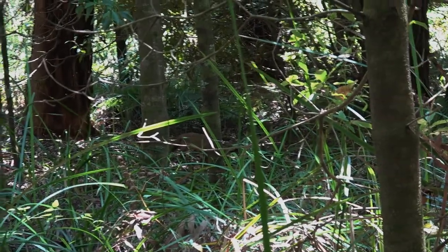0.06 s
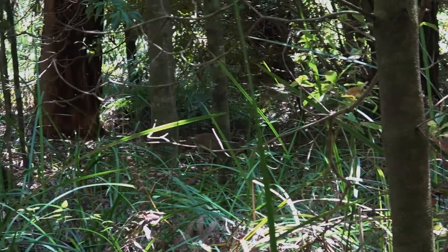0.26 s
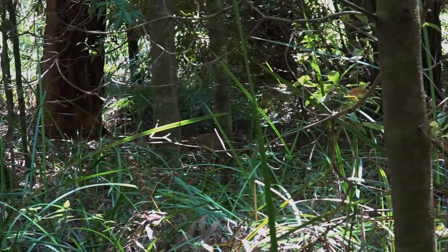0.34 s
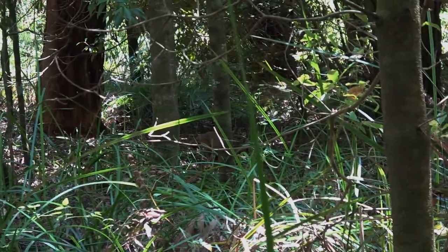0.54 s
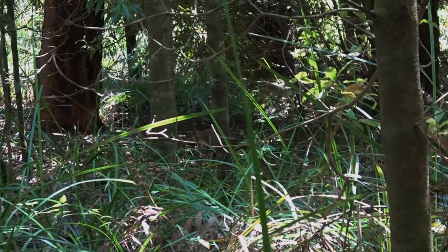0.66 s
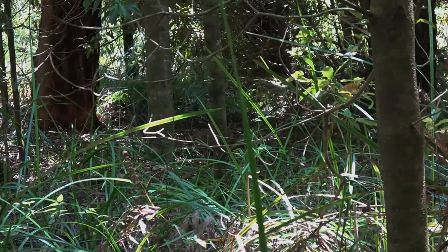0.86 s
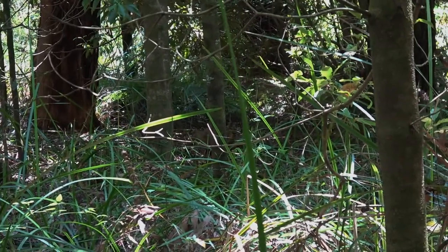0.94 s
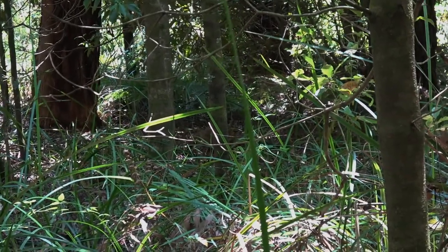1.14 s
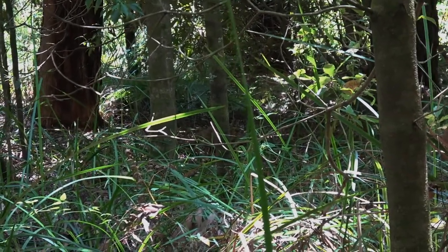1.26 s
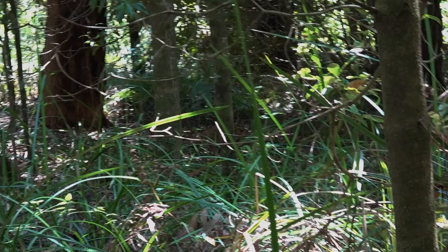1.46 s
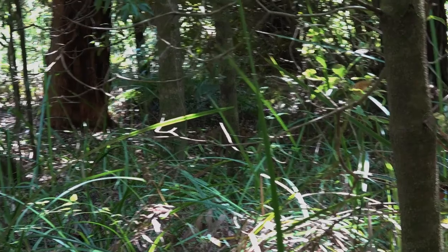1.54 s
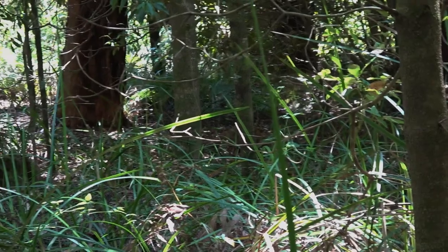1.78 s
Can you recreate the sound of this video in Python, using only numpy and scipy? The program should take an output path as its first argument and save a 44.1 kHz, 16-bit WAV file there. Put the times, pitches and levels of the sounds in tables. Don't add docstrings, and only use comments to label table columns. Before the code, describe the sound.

A whipbird close by, slightly right, repeats pure high whistles that build in strength, drops in a fast slide, then whips sharply upward; the crack rings among trees, followed by faint distant chirps over soft bush hush.

```python
import sys
import numpy as np
from scipy import signal
from scipy.fft import rfft, irfft
from scipy.io import wavfile
from scipy.ndimage import uniform_filter1d

SR = 44100
rng = np.random.default_rng(int(sys.argv[2]) if len(sys.argv) > 2 else 0)


def undo_db(level):
    steps = np.asarray(level, float) / 20
    return 10 ** steps


def to_wav(sig):
    pcm = np.clip(np.atleast_2d(sig), -1, 1) * 32767
    pcm = np.round(pcm).astype(np.int16)
    wavfile.write(sys.argv[1], SR, pcm.T)


N = 79380


def level(x, db):
    return x * undo_db(db) / np.sqrt(np.mean(x ** 2))


def band(hz, width, order=2):
    f = np.arange(N // 2 + 1) * SR / N
    bell = 1 / (1 + ((f - hz) / (width / 2)) ** 2) ** order
    return level(irfft(rfft(rng.standard_normal(N)) * bell, N), 0)


def walk(rate):
    k = int(SR / rate)
    held = np.repeat(rng.standard_normal(N // k + 1), k)
    return 1.05 * uniform_filter1d(uniform_filter1d(held, k), k)[:N]


def pan(x, left_over_right_db):
    return x * undo_db(np.array([[left_over_right_db], [-left_over_right_db]]) / 2)


def sides(x):
    return x * np.array([[1], [-1]])


def tail(t60, rise):
    t = np.arange(N) / SR
    cloud = rng.standard_normal(N) * (1 - np.exp(-t / rise)) * undo_db(-60 * t / t60)
    return level(cloud, 0) / np.sqrt(N)


def spread(x, cloud):
    return signal.fftconvolve(x, cloud)[:N]


def notes(table, share, up, down, sag=1):
    t = np.arange(N) / SR
    for start, length, db, first, last in table:
        u = (t - start) / length
        on = (u >= 0) & (u < 1)
        swell = np.sin(np.pi / 2 * np.clip(u / share, 0, 1)) ** up
        fade = np.sin(np.pi / 2 * np.clip((1 - u) / (1 - share), 0, 1)) ** down
        pitch = first + (last - first) * np.clip(u, 0, 1) ** sag
        yield pitch, on * swell * fade * undo_db(db) * np.sqrt(2)


def slide(curve):
    edge_s = 0.008
    t = np.arange(N) / SR
    s, hz, db = np.array(curve).T

    def smooth(v):
        return uniform_filter1d(np.interp(t, s, v), size=300)

    edge = np.clip(np.minimum(t - s[0], s[-1] - t) / edge_s, 0, 1) ** 2
    return smooth(hz), edge * undo_db(smooth(db)) * np.sqrt(2)


def voice(parts, second_db):
    third_db, breathy_db, air_hz = -38, -24.5, 13000
    tone, over = 0, 0
    breath = 1 + undo_db(breathy_db) * band(170.0, 440.0)
    for hz, gain in parts:
        phase = 2 * np.pi * np.cumsum(hz) / SR
        second = undo_db(second_db) * np.sin(2 * phase) / (1 + (2 * hz / air_hz) ** 6)
        third = undo_db(third_db) * np.sin(3 * phase) / (1 + (3 * hz / air_hz) ** 6)
        tone = tone + gain * breath * np.sin(phase)
        over = over + gain * (second + third)
    return tone, over


def whipbird():
    # (start [s], length [s], level [dB], first pitch [Hz], last pitch [Hz])
    whistles = [(-.005, 0.08, -36, 3652, 3551), (.118, 0.079, -31.5, 3595, 3506),
                (.252, .066, -25, 3626, 3516), (.378, 0.076, -24, 3574, 3509), (.5, 0.062, -23, 3600, 3452),
                (.572, 0.069, -36.5, 3480, 3510), (.622, .034, -24, 3566, 3533),
                (.648, 0.051, -16, 3579, 3547), (.76, .058, -17.5, 3594, 3462),
                (.81, 0.03, -18, 3472, 3460), (.862, 0.016, -39.5, 3454, 3440)]
    # (time [s], pitch [Hz], level [dB])
    fall = [
        (.896, 3540, -46),
        (.908, 3316, -32),
        (.926, 2910, -26),
        (.945, 2489, -30),
        (.97, 2134, -33),
        (.99, 1846, -37.5),
        (1.012, 1737, -38.5),
        (1.035, 1693, -55),
    ]
    # (time [s], pitch [Hz], level [dB])
    whip = [
        (1.108, 3295, -48),
        (1.12, 3269, -31.5),
        (1.14, 3466, -23.5),
        (1.16, 3866, -20),
        (1.175, 4526, -23.5),
        (1.198, 5870, -26.5),
        (1.216, 6820, -30),
        (1.228, 7460, -37),
        (1.236, 8280, -53),
    ]
    note_wet_db, slide_direct_db, overtone_direct_db = -4, -2, -17
    twigs_t60_s, twigs_db = 0.068, -6
    held, held_over = voice(notes(whistles, share=0.66, up=1.2, down=1.3, sag=0.763), second_db=-52)
    glide, glide_over = voice([slide(fall), slide(whip)], second_db=-42)
    over = undo_db(2.5) * held_over + undo_db(8) * glide_over
    twigs = tail(twigs_t60_s, 0.00067) * undo_db(5.7 * rng.standard_normal(N))
    twigs = undo_db(twigs_db) * twigs / np.sqrt(np.sum(twigs ** 2))
    straight = held + undo_db(slide_direct_db) * glide + undo_db(overtone_direct_db) * over
    straight = straight + spread(glide + over, twigs)
    return undo_db(note_wet_db) * held + glide + over, straight


def scatter_cloud():
    near = undo_db(-4.5) * tail(t60=0.39, rise=0.0033)
    far = undo_db(-12.5) * tail(t60=0.94, rise=0.064)
    return near + far


def trees(x, straight):
    # (delay [s], level [dB])
    echoes = [
        (.043, -43),
        (.085, -30),
    ]
    bird_pan_db, wide_db = -5, -24.5
    mid = scatter_cloud()
    for delay, db in echoes:
        mid[int(delay * SR)] += undo_db(db)
    bird = pan(straight + spread(x, mid), bird_pan_db)
    return bird + undo_db(wide_db) * sides(spread(x, scatter_cloud()))


def far_birds(table, t60, wet_db):
    pan_db = -4.5
    x = 0
    for hz, gain in notes(table, share=0.3, up=1.2, down=1.1):
        x = x + gain * np.sin(2 * np.pi * np.cumsum(hz) / SR)
    wet = undo_db(wet_db + 3.5 * walk(40)) * spread(x, tail(t60, 0.01))
    return pan(x + wet, pan_db) + undo_db(-10) * sides(spread(x, tail(t60, 0.01)))


def far_pings():
    # (start [s], length [s], level [dB], pitch [Hz])
    pings = [(-.01, 0.053, -52.5, 5470), (.05, 0.014, -59.5, 4910), (0.127, 0.021, -60, 4900),
             (.95, 0.017, -51, 5800), (1.411, 0.048, -44.5, 4953), (1.536, 0.043, -47, 6093),
             (1.57, 0.046, -49, 6183), (1.691, 0.058, -52, 5163), (1.78, .04, -47, 5340),
             (1.03, .03, -61, 4000), (1.053, 0.025, -63, 5300), (0.964, .07, -63.5, 7100)]
    steady = [(*row, row[-1]) for row in pings]
    return far_birds(steady, t60=1.03, wet_db=2)


def rustles():
    # (middle [s], width [s], level [dB], centre [Hz])
    puffs = [(0.17, 0.034, -59.5, 6800), (0.14, .03, -70, 12600), (.4, .05, -56.5, 6750),
             (.56, 0.067, -57.5, 6800), (.7, 0.079, -58.5, 7000), (1.8, 0.03, -66.5, 12500),
             (1.76, .04, -58, 6200), (0.7, 0.26, -71.5, 18000), (0.72, 0.12, -70.5, 6500),
             (1.3, 0.058, -56.5, 1170), (1.15, 0.026, -59.5, 1440), (1.3, .025, -61, 8400)]
    t, out = np.arange(N) / SR, 0
    for mid, width, db, hz in puffs:
        gain = undo_db(db + 1.5 * walk(120)) * np.exp(-0.5 * ((t - mid) / width) ** 2)
        leaves = band(hz, hz * 0.81) + undo_db(-7.5) * sides(band(hz, hz * 0.9))
        out = out + gain * leaves
    return out


def drones():
    # (centre [Hz], width [Hz], level [dB], left over right [dB], flicker [dB])
    hums = [
        (70.4, 51, -55, -2, 0),
        (110.5, 56, -65, -4.5, -1.5),
        (310.5, 214, -68, 5, 0),
        (649.4, 666, -55, 3, 0.5),
        (1167, 207, -58.5, -12.5, 0.5),
        (2577, 300, -73, -0.5, 2.5),
        (3400, 750, -82, -22, -15.5),
    ]
    out = 0
    for hz, width, db, lr, flicker in hums:
        centred = undo_db(db + flicker * walk(13.8)) * band(hz, width)
        out = out + pan(centred, lr) + undo_db(db - 17) * sides(band(hz, width))
    return out


def bush():
    # (frequency [Hz], level per Hz [dB])
    hush = [(20, -4), (150, -4.5), (900, -8), (1500, -14), (2300, -19), (4000, -17), (9000, -23.5),
            (15500, -28)]
    hush_db, side_db = -56.5, -10.5
    f = np.arange(N // 2 + 1) * SR / N + 1
    hz, db = np.array(hush).T
    colour = undo_db(np.interp(np.log(f), np.log(hz), db))
    mid, side = irfft(rfft(rng.standard_normal((2, N))) * colour, N)
    side = signal.lfilter(*signal.butter(1, 120, 'high', fs=SR), side)
    return level(mid + undo_db(side_db) * sides(side), hush_db) * undo_db(1.7 * walk(7.1))


def far_chirps():
    # (start [s], length [s], level [dB], first pitch [Hz], last pitch [Hz])
    chirps = [(1.572, 0.014, -47.5, 8000, 6970), (1.582, 0.024, -53, 7270, 8300),
              (1.398, .015, -56.5, 2710, 2630), (1.425, 0.014, -53.5, 2675, 2690),
              (1.51, 0.017, -55.5, 2350, 2244), (1.715, 0.015, -54.5, 3780, 3340),
              (1.74, .015, -60.5, 3050, 3020), (1.765, .025, -60, 3170, 3400),
              (.365, 0.048, -61.5, 2930, 2650), (.485, 0.035, -60, 2930, 2610),
              (.55, 0.031, -60.5, 2850, 2610), (.61, 0.026, -61, 2820, 2760), (.67, 0.035, -56, 2860, 2620),
              (.735, .03, -61, 2750, 2525), (.8, 0.032, -59, 2720, 2520)]
    return far_birds(chirps, t60=0.25, wet_db=2)


def scene():
    near = trees(*whipbird())
    far = far_pings() + far_chirps()
    return near + far + rustles() + drones() + bush()


def low_pass(x):
    return signal.sosfilt(signal.butter(12, 15630, fs=SR, output="sos"), x)


def record(dry):
    return low_pass(dry)


dry = scene()
out = record(dry)
to_wav(out)
```